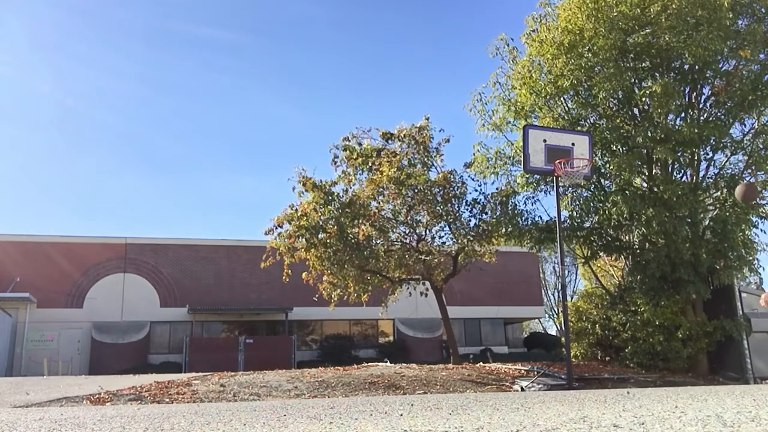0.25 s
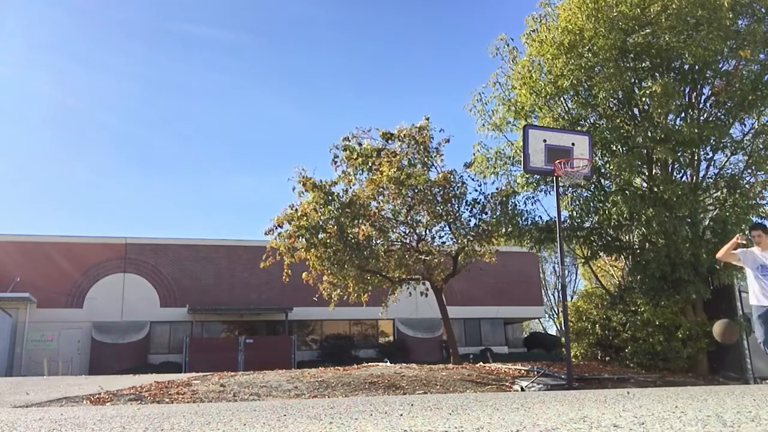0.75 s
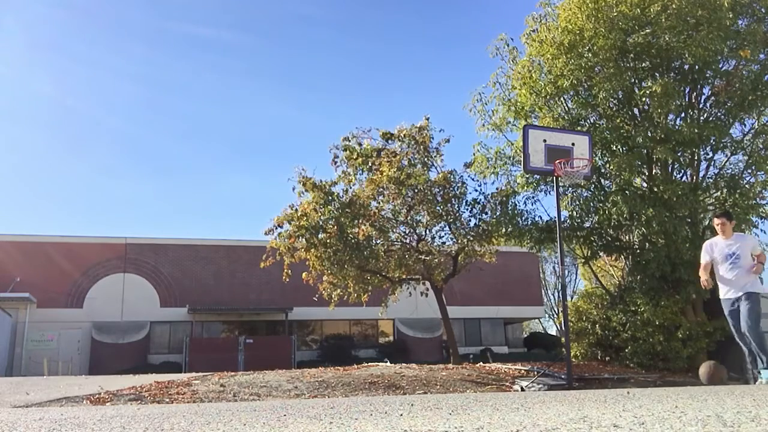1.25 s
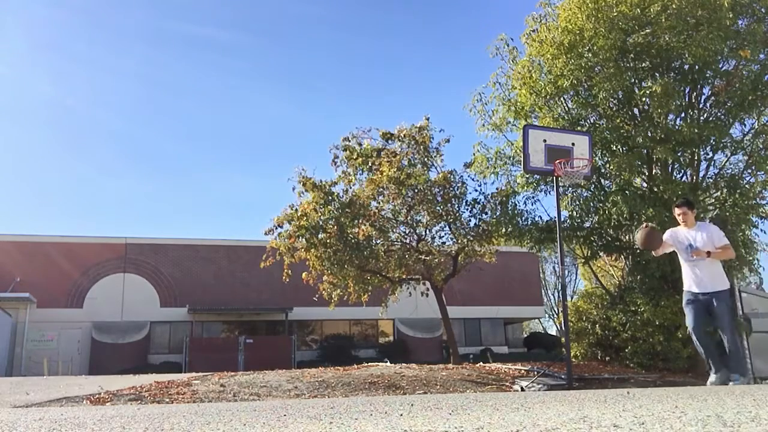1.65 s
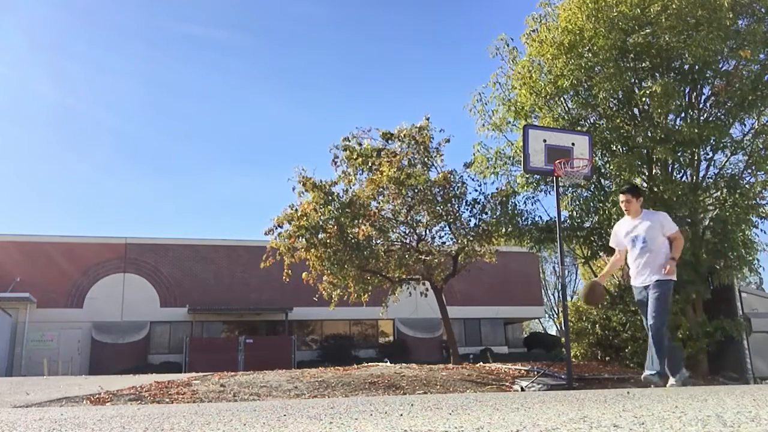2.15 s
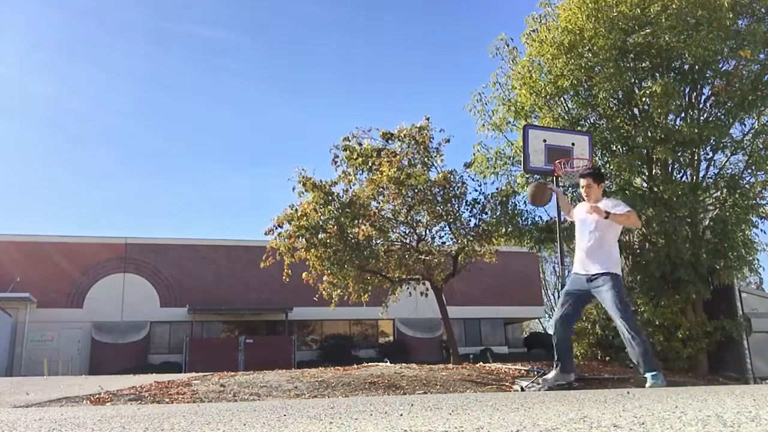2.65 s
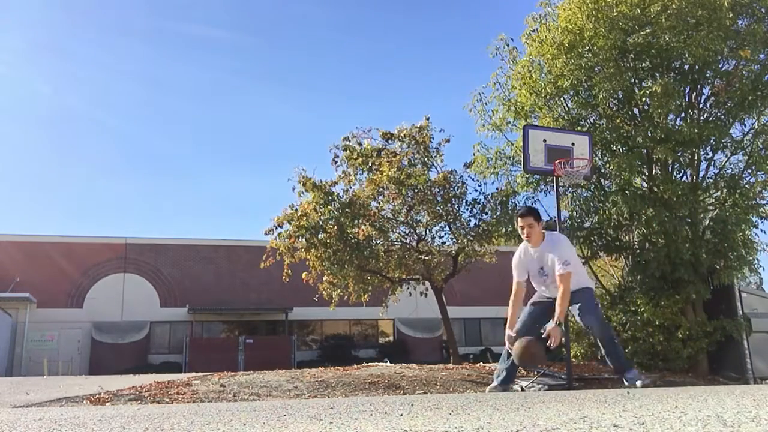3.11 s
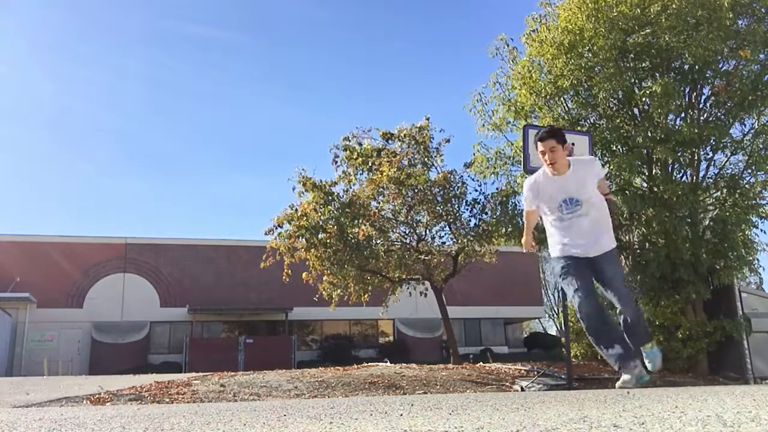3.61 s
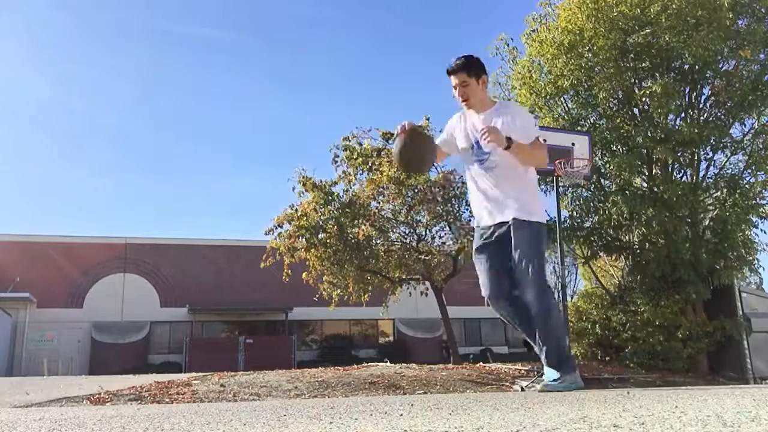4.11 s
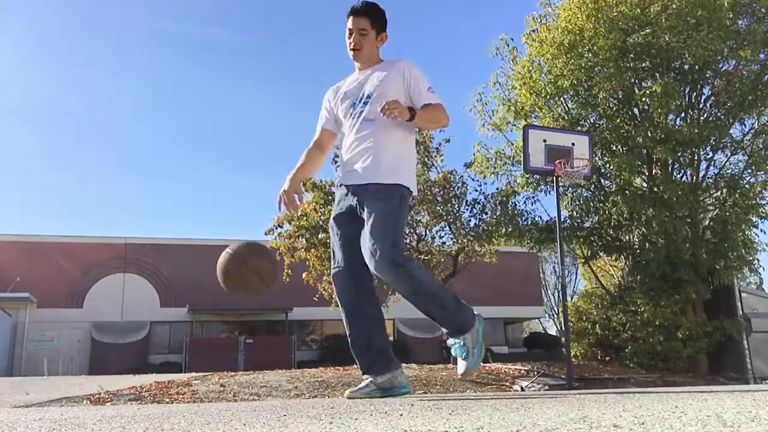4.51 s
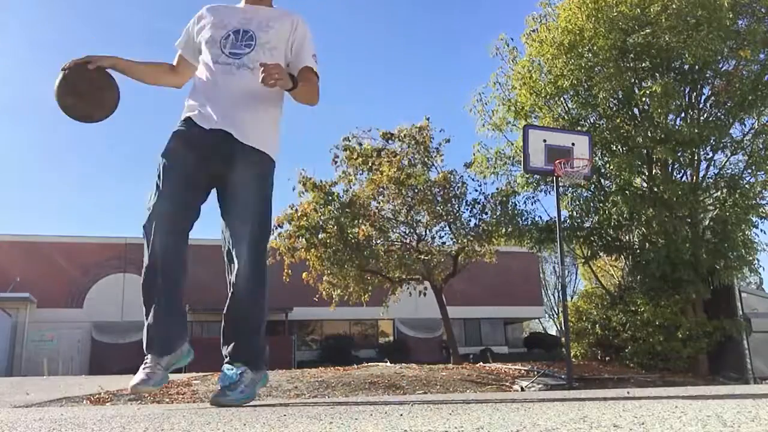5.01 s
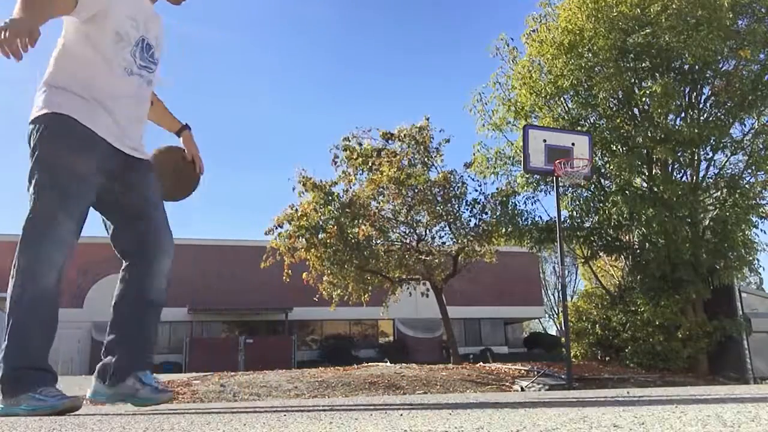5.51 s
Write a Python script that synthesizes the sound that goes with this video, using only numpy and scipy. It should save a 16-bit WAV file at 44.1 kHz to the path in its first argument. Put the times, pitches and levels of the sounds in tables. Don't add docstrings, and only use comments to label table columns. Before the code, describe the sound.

A basketball is dribbled irregularly on an outdoor asphalt lot. Each hit is a sharp slap with a hollow thump and a short metallic ring, followed by a quick smeared echo from nearby walls. Between bounces, shoes scuff and snap grit. Later bounces are harder, with a loud palm pop in the last part. One fixed mono microphone near the ground; faint traffic underneath.

```python
import sys
import numpy as np
from scipy import signal
from scipy.fft import rfft, irfft
from scipy.io import wavfile

SR = 44100
rng = np.random.default_rng(int(sys.argv[2]) if len(sys.argv) > 2 else 0)


def invert_db(x):
    u = np.asarray(x, float) / 20
    return 10 ** u


def master(y):
    cut = np.clip(np.atleast_2d(y).T, -1, 1)
    pcm = np.round(cut * 32767)
    wavfile.write(sys.argv[1], SR, pcm.astype(np.int16))


N = 254016

# time in seconds, contact time as a ratio to the usual.
TOUCHES = [(0.8263, 1.0), (1.2024, .9), (1.4108, .99), (2.1623, .98), (3.3273, 1.07), (3.9863, 1.0),
           (4.7314, .97), (5.4184, 1.02)]
# thump level in dB (its force), slap level in dB, slap pitch in Hz,
# crack level in dB, knock level in dB.
BOUNCES = [
    (-12, -3.5, 1340, -26.5, -10),
    (-17.5, -6, 1555, -19.5, -10),
    (-12, -5, 1950, -30.5, -15.5),
    (-10.5, -3.5, 1380, -20.5, -13),
    (-17.5, -6, 1810, -38, -14.5),
    (-8, 0.5, 2130, -26.5, -9),
    (-5, -1, 1560, -17, -9),
    (-9, -0.5, 2160, -18, -19.5),
]
# level in dB of the first, second, third and fourth air mode, one row a bounce.
FACING = [(8.5, 8, 1, 1), (7, -1, 1, 0.1), (13.5, 6, 11.5, 4), (11, -2, 4, 1.5), (-13, 1, -7, 10),
          (2, -4, 3.5, -26), (-6.5, -1, -14, -5), (-3, 11.5, 8.5, 8)]
# time in seconds, distance from the wall in metres.
WALL_DISTANCE = [(0.8, 3.5), (3.33, 6.4), (4.0, 13), (5.45, 10.1)]
USUAL_FORCE_DB = -11


def ball():
    out = np.zeros(N)
    lead = .012
    t = np.arange(int(SR * .6)) / SR - lead
    for (s, stretch), bounce, facing_db in zip(TOUCHES, BOUNCES, FACING):
        thump_db, slap_db, slap_hz, crack_db, knock_db = bounce
        force_db = thump_db - USUAL_FORCE_DB
        wall_m = np.interp(s, *np.transpose(WALL_DISTANCE))
        hit = invert_db(slap_db) * slap(t, slap_hz)
        hit += invert_db(crack_db + 13.5) * crack(t)
        hit += invert_db(slap_db - 43.5) * tick(t)
        hit += invert_db(-24 + 2.03 * force_db) * release(t, at=.013 * stretch)
        hit += body(t, thump_db, knock_db, stretch)
        place = yard(delay=2 * wall_m / 343, echo_db=-13 - 1.22 * wall_m)
        ring = ringing(t, np.add(facing_db, -55 + 3 * force_db), upper_db=-15 + 1.42 * wall_m)
        add(out, s - lead, signal.fftconvolve(hit, place)[:len(t)] + ring)
    return out


def slap(t, hz):
    out = 0
    # delay in seconds, level in dB, pitch ratio
    for at, jolt_db, sag in [(0, 0, 1), (.0026, -4, .82), (.0047, -8, .66), (.0075, -14, .6)]:
        age = np.maximum(t - at * rng.uniform(0.872, 1.3), 0)
        attack = np.minimum(age / 0.00036, 1)
        # pitch ratio, level in dB, decay in seconds
        for ratio, db, decay in [(0.954, 3.5, 0.00082), (0.629, -7.0, 0.0012), (1.44, -7, 0.0012)]:
            detune = 1 + rng.normal(0, .04)
            wave = np.sin(2 * np.pi * hz * ratio * sag * detune * age - .9)
            luck_db = rng.normal(0, 1.5)
            out = out + invert_db(jolt_db + db + luck_db) * wave * np.exp(-age / decay) * attack
    return band(out, 320, 6100)


# frequency in Hz, density in dB per Hz.
CRACK_COLOUR = [(880, -41), (1500, 4.5), (2060, -6), (2460, -1.5), (3960, 3), (4830, -10), (6500, -15.5),
                (7690, -28), (10600, -85), (14300, -45), (16000, -69)]


def crack(t):
    age = np.maximum(t, 0)
    decay = np.exp(-age / 0.00037) + 0.062 * np.exp(-age / 0.0063)
    shape = decay * np.minimum(age / 0.000071, 1)
    front = band(band(coloured(CRACK_COLOUR, len(t)) * shape, 1200, 7000), 900, 9000)
    return front * np.linalg.norm(shape) / np.linalg.norm(front)


def tick(t):
    shape = (t > 0) * np.exp(-np.maximum(t, 0) / 0.0007)
    click = band(rng.standard_normal(len(t)) * shape, 6500, 12000)
    return click * np.linalg.norm(shape) / np.linalg.norm(click)


def body(t, thump_db, knock_db, stretch):
    u = t / stretch
    lift_off = 1 / (1 + np.exp(np.clip((u - .0212) / .0012, -50, 50)))
    swing = bell(u, 0.015, 0.0072) * lift_off + 0.24 * bell(u, -0.0021, 0.0047)
    thump = np.cos(2 * np.pi * 96 * (u - .0074)) * swing
    sway = -.16 * np.sin(2 * np.pi * 56 * (u - .021)) * bell(u, .031, .011) * (1 - lift_off)
    knock_shape = np.minimum(np.maximum(u, 0) / .0015, 1) * bell(np.maximum(u, .004), .004, .005)
    knock = np.cos(2 * np.pi * 208 * (u - .0026)) * knock_shape
    wobble_hz = rng.uniform(262, 490.5)
    wobble = np.sin(2 * np.pi * (wobble_hz * u + rng.random())) * bell(u, 0.015, 0.0044)
    return invert_db(thump_db) * (thump + sway + 0.23 * wobble) + invert_db(knock_db) * knock


def release(t, at):
    shape = bell(t, at, .003)
    noise = rng.standard_normal(len(t))
    low = band(band(noise, 894, 1320), 810, 2300)
    high = band(band(noise, 1900, 3730), 2100, 3300)
    flutter = (low + 0.096 * high) * shape
    return flutter / np.sqrt(np.sum(flutter ** 2) / np.sum(shape ** 2))


# frequency in Hz, time to fall 60 dB in seconds.
AIR_MODES = [(972, 0.75), (1583, 0.27), (2140, 0.6), (2815, 0.8)]
# frequency in Hz, level in dB against the mean air mode,
# time to fall 60 dB in seconds.
UPPER_MODES = [(1362, -3, .2), (2681, -3, .3), (3203, -2, .3), (3456, -5, .25), (3750, -5, .22),
               (4366, -5, .3), (5023, -11, .2), (5900, -13, .18)]


def ringing(t, levels_db, upper_db):
    age = np.maximum(t - 0.004, 0)
    out = 0
    modes = [(hz, db, t60, 12) for (hz, t60), db in zip(AIR_MODES, levels_db)]
    for hz, db, t60 in UPPER_MODES:
        modes.append((hz, np.mean(levels_db) + upper_db + db + rng.normal(0, 2), t60, 45))
    for hz, db, t60, split_hz in modes:
        lines = np.sin(2 * np.pi * (hz * age + rng.random()))
        for _ in range(3):
            side_hz = hz + rng.normal(0, split_hz)
            lines += .33 * np.sin(2 * np.pi * (side_hz * age + rng.random()))
        out = out + invert_db(db + 1.5 - 60 * age / t60) * lines
    return out * np.minimum(age / .008, 1)


def yard(delay, echo_db):
    t = np.arange(SR // 2) / SR
    shape = 0
    for at, db in [(delay, 0), (delay + .034, -11)]:
        shape = shape + invert_db(db) * (t > at) * np.exp(-np.maximum(t - at, 0) / 0.0095)
    smear = shape * rng.standard_normal(len(t))
    tail = np.minimum(t / .012, 1) * invert_db(-60 * t / 0.27) * rng.standard_normal(len(t))
    wet = invert_db(echo_db) * smear / np.linalg.norm(smear) + invert_db(-20.5) * tail / np.linalg.norm(tail)
    wet = band(wet, 210, 10000) + invert_db(0.5) * band(wet, 3350, 10200)
    wet[0] = 1
    return wet


# start in seconds, level in dB, length in seconds, grit pitch in Hz.
GRINDS = [(1.1116, -24.5, .011, 1350), (1.146, -29, 0.0064, 1150), (1.2045, -11, 0.0084, 1440),
          (1.2314, -32, .015, 3200), (1.352, -27.5, 0.016, 1230), (1.9345, -26.5, 0.021, 1130),
          (2.289, -34.5, 0.012, 960), (2.939, -36, 0.0061, 4500), (3.048, -36.5, 0.03, 1080),
          (3.0986, -37.5, 0.032, 2430), (3.76, -32.5, 0.03, 950), (4.062, -37, .011, 993),
          (4.121, -18, .019, 1050), (4.5247, -29, 0.026, 1390), (4.554, -30.5, 0.01, 930),
          (4.5975, -39.5, 0.084, 1080), (4.8734, -29.5, .014, 1040)]
# start in seconds, level in dB, length in seconds, grit pitch in Hz.
SCUFFS = [(0.1614, -33, 0.047, 1250), (0.656, -28.5, 0.023, 2190), (0.695, -34, .018, 2440),
          (1.338, -25.5, 0.0048, 1410), (1.915, -28, .01, 2170), (2.3038, -20.5, 0.026, 3100),
          (2.3258, -28.5, 0.04, 1180), (2.769, -15.5, 0.018, 1270), (2.816, -30, 0.021, 2500),
          (2.9465, -32, 0.053, 1740), (3.01, -35, 0.065, 600), (3.438, -37, 0.034, 1200),
          (3.475, -47, 0.013, 1160), (3.7425, -28.5, 0.012, 960)]
# start in seconds, level in dB, length in seconds, pitch in Hz.
RUBS = [(0.97, -36.5, 0.021, 950), (1.022, -35, 0.0099, 1670), (1.088, -37, 0.013, 1050),
        (2.975, -37, 0.026, 920), (3.015, -31, 0.011, 1240), (3.035, -37, .012, 1150),
        (3.46, -41, 0.024, 1170), (3.3594, -33, 0.025, 1280), (3.495, -35, .02, 1210),
        (3.524, -31, 0.0063, 1350), (4.12, -26, 0.0064, 534), (4.155, -31.5, 0.033, 1050),
        (4.862, -45, .012, 1100), (4.9327, -28.5, 0.014, 1570), (5.6144, -33.5, 0.024, 1530)]


def shoes():
    grinding = scuffs(GRINDS, thud_db=0.5, bright_db=15.5, focus_db=6)
    landing = scuffs(SCUFFS, thud_db=-3, bright_db=8.5, focus_db=8)
    rubbing = scuffs(RUBS, thud_db=-3, bright_db=-17, focus_db=23)
    return grinding + landing + rubbing


# frequency in Hz, density in dB per Hz.
SOLE_COLOUR = [(120, -35), (200, 3), (509, 9), (836, -0.5), (1270, 0.5), (2420, -2.5), (2700, -2.5),
               (3830, -10.5), (4770, -21.5), (6640, -28), (7680, -38), (13800, -46), (16000, -49)]


def scuffs(rows, thud_db, bright_db, focus_db):
    out = np.zeros(N)
    t = np.arange(SR // 8) / SR
    hz = np.geomspace(100, 17000, num=40)
    colour_hz, colour_db = np.transpose(SOLE_COLOUR)
    sole_db = np.interp(np.log(hz), np.log(colour_hz), colour_db)
    tilt_db = np.interp(np.log(hz), np.log([600, 1500, 3000, 7000]), [thud_db, 0, 0, bright_db])
    for s, db, length, grit_hz in rows:
        peak_db = focus_db * bell(np.log(hz / grit_hz), 0, .25)
        sound = filtered(grains(len(t)), np.transpose([hz, sole_db + tilt_db + peak_db]))
        clumps_db = np.interp(t, np.arange(50) * .003, rng.normal(0, 4.5, size=50))
        shape = np.minimum(t / .002, 1) * invert_db(-np.maximum(t - length, 0) * 1100)
        sound = shape * invert_db(clumps_db) * sound
        loudness = np.linalg.norm(band(sound, 1000, 5000)) / np.linalg.norm(shape)
        add(out, s, invert_db(db - 14) * sound / loudness)
    return out


# start in seconds, level in
# dB, pitch in Hz.
SNAPS = [(0.302, -37, 3030), (0.7073, -32.5, 2700), (0.7657, -40.5, 3180), (1.3406, -24, 3560),
         (1.847, -34, 3690), (1.907, -28, 2400), (2.308, -26, 2600), (2.322, -16, 3300), (2.352, -27, 4000),
         (2.575, -28.5, 4360), (2.9584, -16, 3360), (2.984, -25, 3100), (3.1141, -21.5, 3600),
         (3.1264, -24.5, 3740), (3.2148, -34, 3650), (3.3933, -33, 3260), (3.7027, -33, 4170),
         (4.07, -29, 3370), (4.077, -33, 3710), (4.1808, -31.5, 3450), (4.527, -22, 3110),
         (4.548, -31, 3800), (4.5614, -42, 3000), (4.9211, -19.5, 3320), (5.0518, -25.5, 3260),
         (5.0685, -36, 3300), (5.239, -34.5, 3900), (5.325, -30, 3860), (5.396, -38, 3800)]
# start in seconds, level in dB, pitch in Hz.
PALM = [
    (4.516, -3.5, 660),
    (4.912, -17.5, 1440),
    (5.598, -15.5, 1510),
    (5.639, -29, 1466),
]


def snaps():
    out = np.zeros(N)
    t = np.arange(SR // 20) / SR
    for s, db, hz in SNAPS:
        snap = band(rng.standard_normal(len(t)) * np.exp(-t / 0.00078), hz * .5, hz * 1.17)
        add(out, s, invert_db(db - 5) * snap / np.abs(snap).max())
    for s, db, hz in PALM:
        pop = -np.sin(2 * np.pi * hz * t) * t / 0.001 * np.exp(1 - t / 0.00064)
        skin = band(rng.standard_normal(len(t)), 940, 2800) * np.exp(-t / 0.0044)
        add(out, s, invert_db(db - 4.5) * (pop + 0.31 * skin))
    return out


# time of full pressure in seconds, level in dB, hold in seconds.
SLIDES = [(0.197, -90, .06), (0.7, -83, 0.11), (1.234, -77, 0.018), (1.513, -81, 0.025), (1.939, -84, .04),
          (2.326, -88, .04), (2.968, -70.5, 0.089), (3.38, -74, 0.019), (4.045, -78.5, 0.13),
          (4.254, -76.5, 0.089), (4.78, -79.5, 0.37), (5.29, -84, 0.033), (5.454, -78, 0.039),
          (5.67, -78.5, 0.058)]
# frequency in Hz, density in dB per Hz.
GRIT_COLOUR = [(2350, -8), (4000, 2), (4900, -8), (6660, -6), (7790, -18), (9010, -12), (10400, -19),
               (14200, -15.5), (16000, -34)]


def drag():
    t = np.arange(N) / SR
    press_db_per_s, lift_db_per_s = 199, 80.5
    gain = invert_db(-100)
    for s, db, hold in SLIDES:
        press_db = press_db_per_s * np.maximum(s - t, 0)
        lift_db = lift_db_per_s * np.maximum(t - s - hold, 0)
        gain = gain + invert_db(db - press_db - lift_db)
    hiss = filtered(grains(N), GRIT_COLOUR)
    hiss = hiss / np.std(band(hiss, 5000, 18500))
    return gain * invert_db(9.0 + 3.5 * drift(25.0)) * hiss


def grains(size):
    sizes = invert_db(2.5 * np.minimum(rng.exponential(1, size), 4)) * rng.choice([-1, 1], size)
    contacts = rng.random(size) < 6000 / SR
    return sizes * contacts + .45 * rng.standard_normal(size)


# time in seconds, level in dB.
HUM = [(0.0, -40.5), (0.64, -40), (1.33, -38), (1.75, -39), (2.2, -38.5), (3.95, -40), (4.81, -38),
       (5.36, -40.5), (5.76, -42)]
# frequency in Hz, density in dB per Hz.
RUMBLE_COLOUR = [(13, -48), (22, -41), (34, -4.5), (60, -1), (97, -8), (225, -18), (251, -20), (360, -15),
                 (437, -37), (600, -37.5), (780, -71), (1320, -120)]
# frequency in Hz, density in dB per Hz.
WASH_COLOUR = [(240, -37), (400, -4), (512, -1), (553, -6.5), (607, 1), (666, -3), (814, -1), (1180, -1.5),
               (1350, -3), (1460, -3.5), (2090, -4), (2510, -9), (2750, -8.5), (4800, -23), (16000, -51.5)]


def traffic():
    t = np.arange(N) / SR
    db = np.interp(t, *np.transpose(HUM))
    rumble = invert_db(db + 1.24 * drift(2.4)) * coloured(RUMBLE_COLOUR, N)
    wash_power = invert_db(-51 + 0.78 * (db - db.mean()) + 0.27 * drift(5.2)) ** 2
    for (s, _), (thump_db, *_) in zip(TOUCHES, BOUNCES):
        age = np.maximum(t - s, 0) / 0.16
        wash_power += invert_db(-59 + thump_db - USUAL_FORCE_DB) ** 2 * age * np.exp(1 - age)
    return rumble + np.sqrt(wash_power) * coloured(WASH_COLOUR, N)


def rms_one(x):
    return x / np.sqrt(np.mean(x ** 2) + 1e-20)


def filtered(x, spectrum):
    hz, db = np.transpose(spectrum)
    f = np.maximum(np.fft.rfftfreq(len(x), 1 / SR), 1)
    gain = invert_db(np.interp(np.log(f), np.log(hz), db))
    return rms_one(irfft(rfft(x) * gain, len(x)))


def coloured(spectrum, size):
    return filtered(rng.standard_normal(size), spectrum)


def band(x, low_hz, high_hz):
    edges = [low_hz, min(high_hz, .45 * SR)]
    return signal.sosfilt(signal.butter(2, edges, "band", fs=SR, output="sos"), x)


def bell(t, at, width):
    return np.exp(-((t - at) / width) ** 2)


def drift(rate_hz):
    r = np.exp(-2 * np.pi * rate_hz / SR)
    return rms_one(signal.lfilter([1], [1, -2 * r, r * r], rng.standard_normal(N + SR))[SR:])


def add(out, s, sound):
    i = round(s * SR)
    out[i:i + len(sound)] += sound[:N - i]


def scene():
    return (ball() + shoes() + snaps() + drag() + traffic())[None]


def low_pass(x):
    return signal.sosfilt(signal.butter(12, 16560, fs=SR, output="sos"), x)


def record(dry):
    bass_cut = signal.butter(2, 34, "high", fs=SR, output="sos")
    top_cut = signal.cheby2(10, 50, 16700, fs=SR, output="sos")
    limited = np.clip(signal.sosfiltfilt(bass_cut, dry), -.98, .98)
    mix = signal.sosfilt(top_cut, limited)
    return low_pass(mix)


dry = scene()
out = record(dry)
master(out)
```